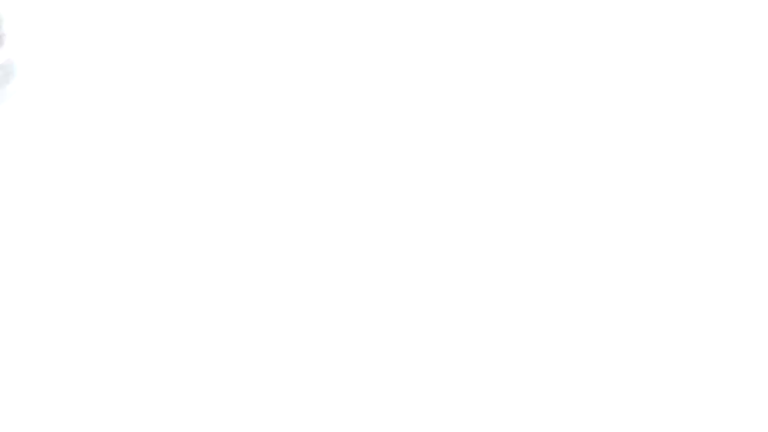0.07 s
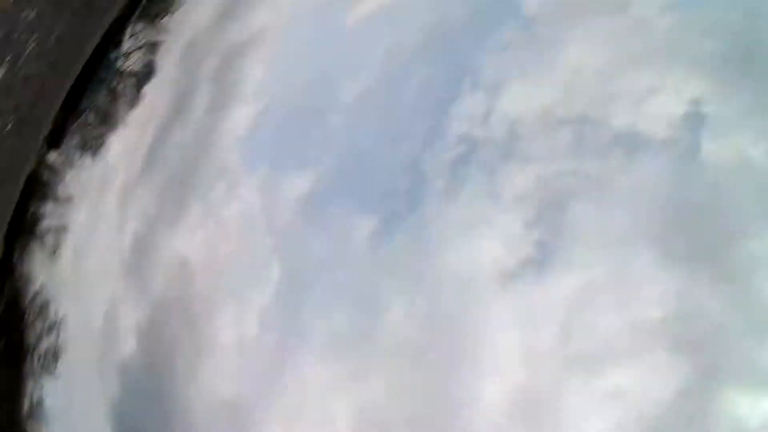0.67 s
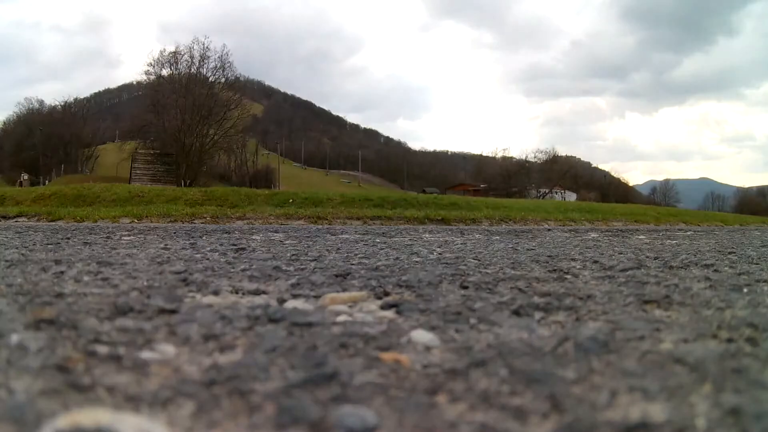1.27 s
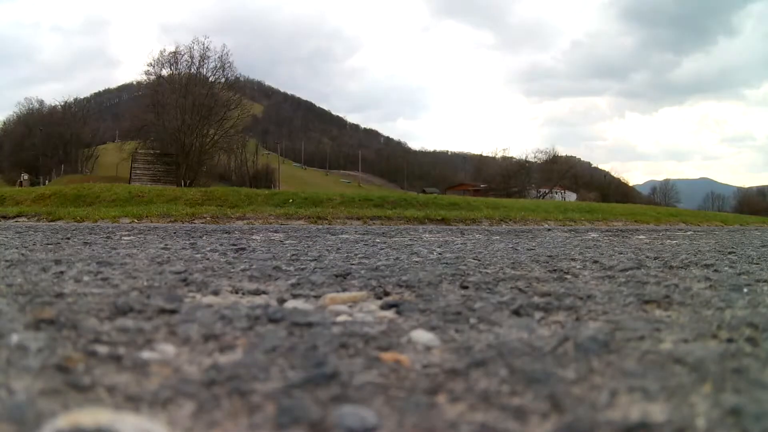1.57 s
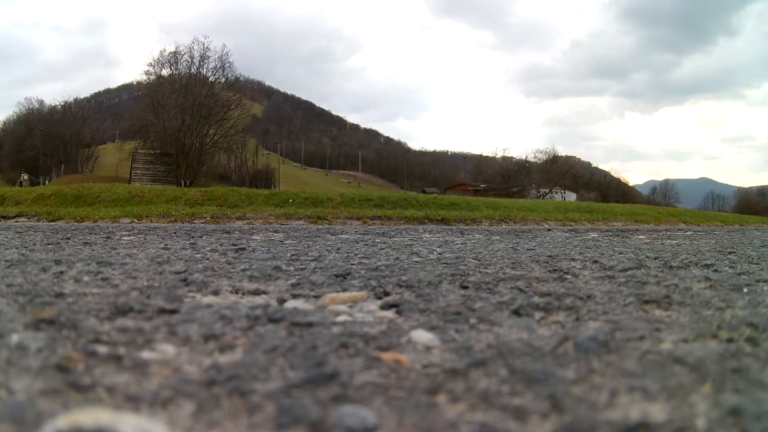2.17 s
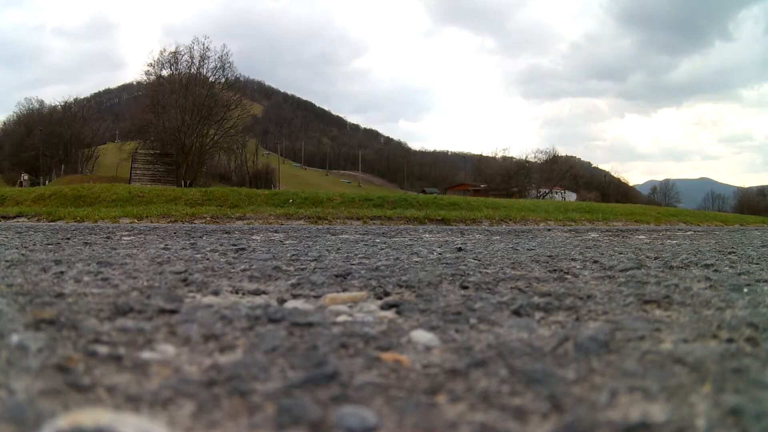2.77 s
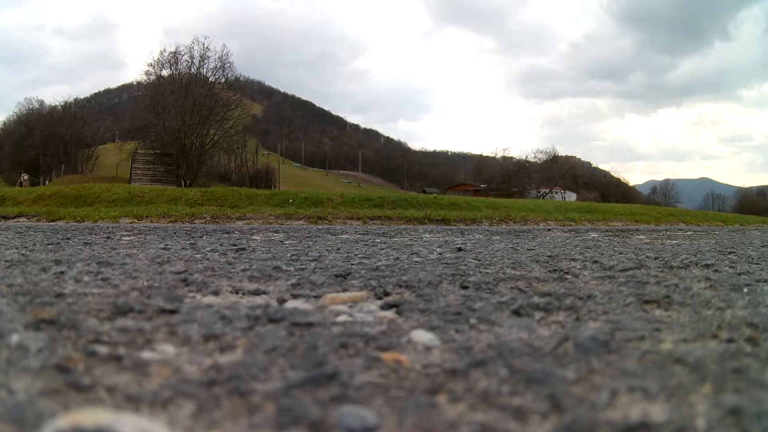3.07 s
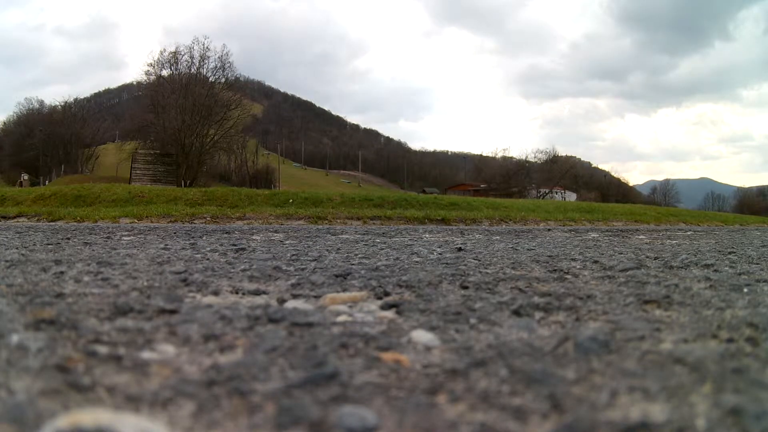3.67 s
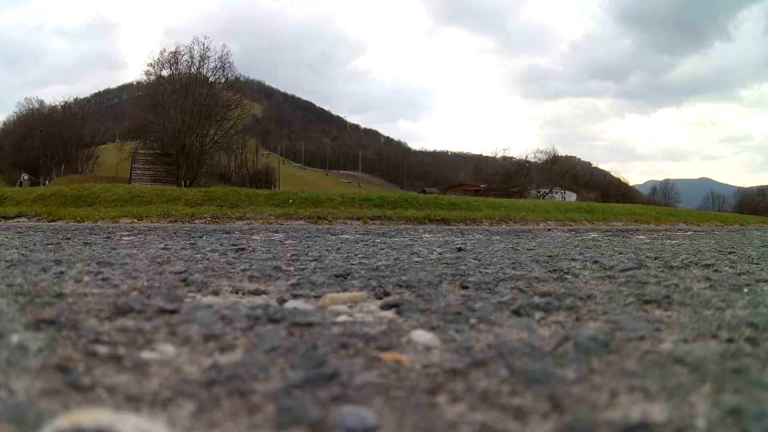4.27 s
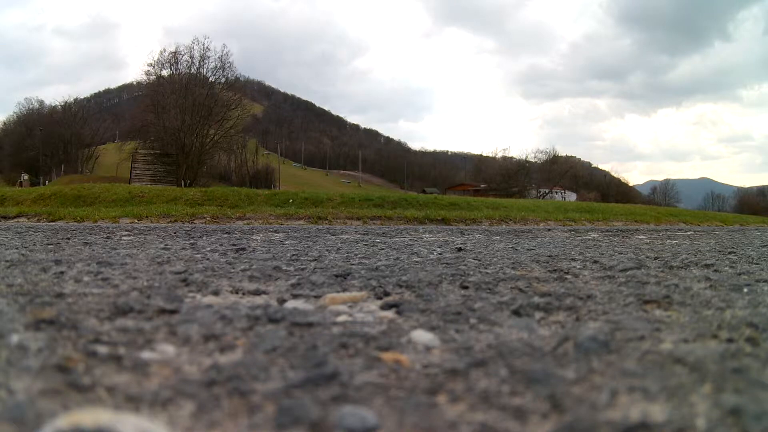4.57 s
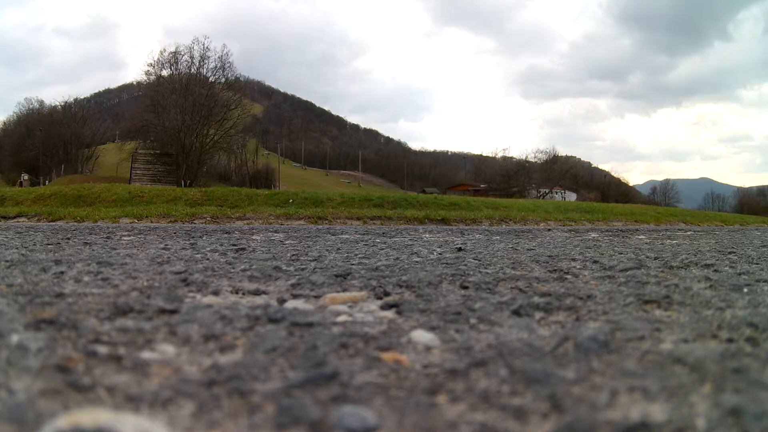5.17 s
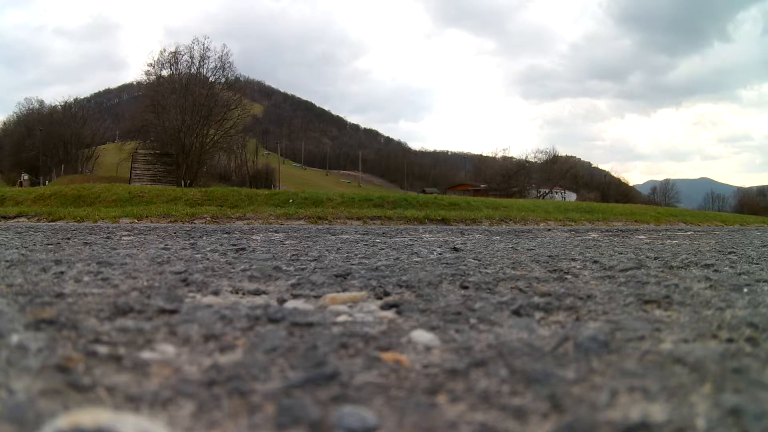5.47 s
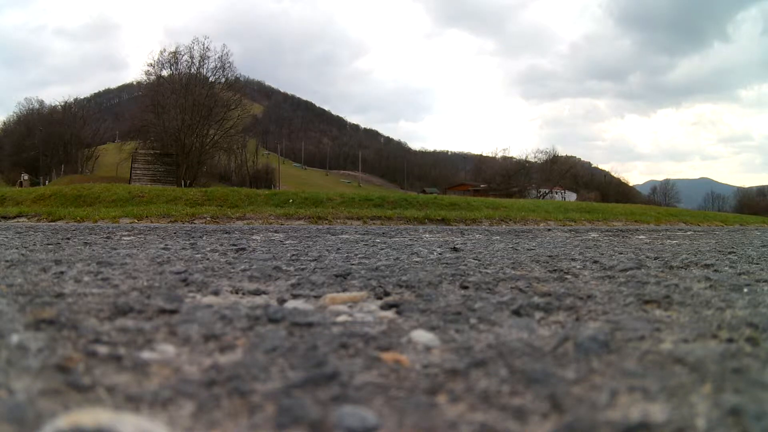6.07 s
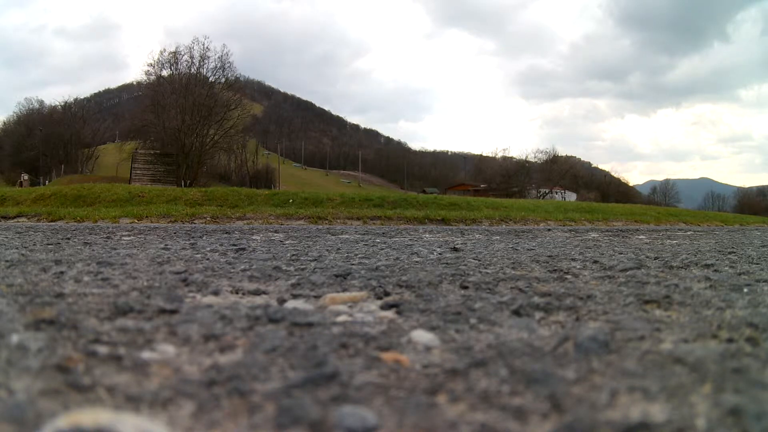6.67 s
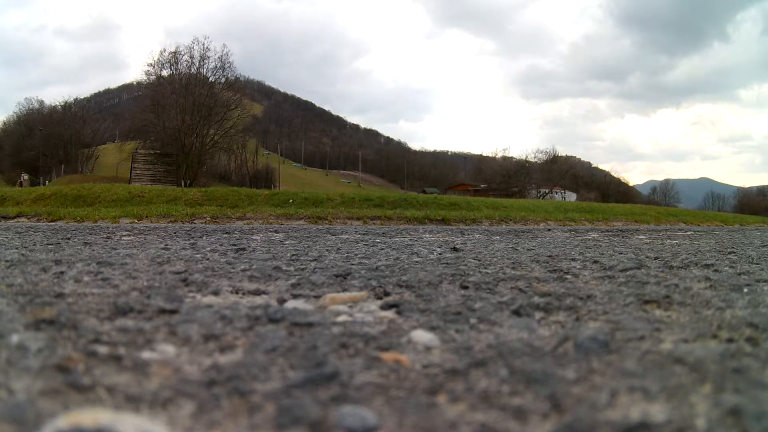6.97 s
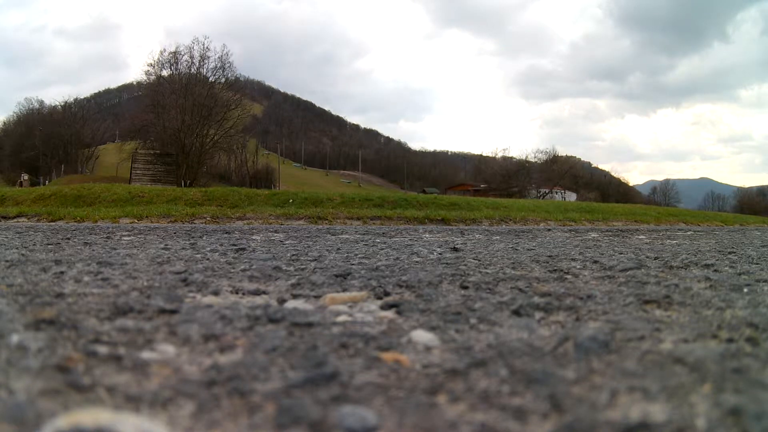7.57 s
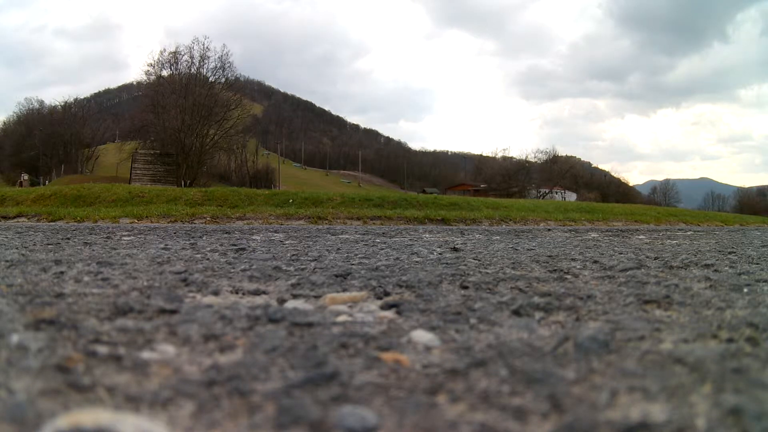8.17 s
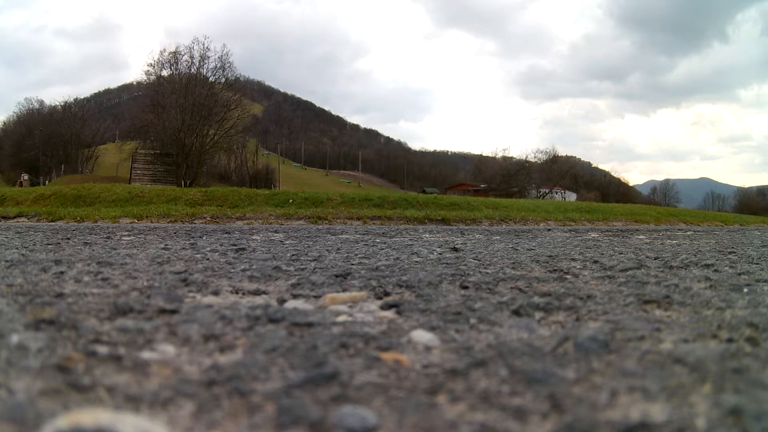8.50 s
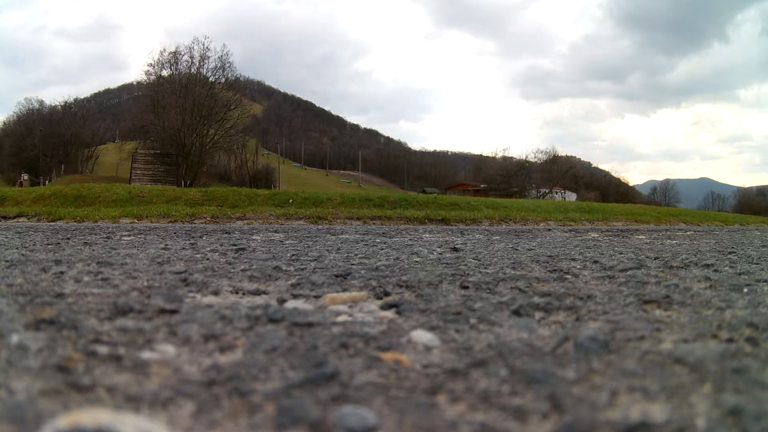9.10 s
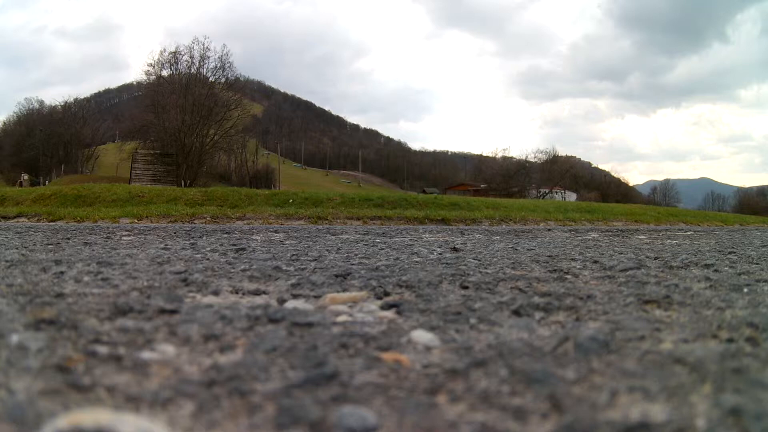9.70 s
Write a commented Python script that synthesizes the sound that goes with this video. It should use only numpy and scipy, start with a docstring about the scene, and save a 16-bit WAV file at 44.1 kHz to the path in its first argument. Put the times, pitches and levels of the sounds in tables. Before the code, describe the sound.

At about 0.2 seconds a small drone slams into gravel, heard very close from a microphone on its frame. A rapid, irregular run of hard plastic cracks follows as it cartwheels, loud enough to distort. Grit scrapes, pebbles click against the frame, the propellers ring briefly after the blows, and a motor clinks near 0.4 and 0.9 seconds. The knocks weaken and stop by 1.3 seconds.

The rest is much quieter: open countryside with a soft hiss and a far rush that swells slightly, then ebbs after 8 seconds. From 2.6 seconds a distant engine putters, growing fainter and stopping around 5.4. Faint, thin bird chirps cluster between 4 and 6 seconds, with single ones near 7.7 and 9.4. Two dull, distant taps come at about 9 and 9.3 seconds, the second softer.

```python
"""Hard plastic cracks and a rattle of stones: a small drone crashes on gravel, cartwheels and skids to rest.
The blows overload the camera riding on its frame and leave the propellers ringing.
Then quiet countryside: a far rush swells and ebbs, an engine putters for three seconds in puffs
of exhaust noise, faint birds whistle, and two dull taps sound in the distance."""
import sys
import numpy as np
from scipy import signal
from scipy.fft import rfft, irfft
from scipy.io import wavfile
from scipy.ndimage import map_coordinates

SR = 44100
rng = np.random.default_rng(int(sys.argv[2]) if len(sys.argv) > 2 else 0)


def file_out(sig):
    """Save sig as 16-bit WAV at sys.argv[1]."""
    # one column per channel
    cols = np.atleast_2d(sig).T
    # limit, then scale
    lim = np.clip(cols, -1, 1)
    pcm = np.round(lim * 32767).astype(np.int16)
    wavfile.write(sys.argv[1], SR, pcm)


N = 438354


def amp(db):
    """Decibels to gain."""
    return 10 ** (np.asarray(db) / 20)


def unit(x):
    """x at rms 1."""
    return x / np.sqrt(np.mean(x ** 2) + 1e-20)


def since(s):
    """Seconds gone by since s at each sample, 0 before it."""
    return np.maximum(np.arange(N) / SR - s, 0)


def before(s):
    """Seconds left until s at each sample, 0 after it."""
    return np.maximum(s - np.arange(N) / SR, 0)


def fade(t, t60):
    """A decay of 60 dB in t60 seconds."""
    return np.exp(-np.log(1000) * t / t60)


def wobble(rate):
    """A smooth random curve, rate knots a second."""
    return map_coordinates(rng.standard_normal(int(N * rate / SR) + 4), [np.arange(N) * rate / SR])


def coloured(x, spectrum, tilt_db=0):
    """x through a (freq_hz, level_db) EQ, its treble tilted by tilt_db an octave about 2 kHz, at rms 1."""
    f = np.fft.rfftfreq(len(x), 1 / SR) + 1
    hz, db = np.transpose(spectrum)
    octaves = np.maximum(np.log2(f / 2000), -1)
    eq_db = np.interp(np.log(f), np.log(hz), db) + tilt_db * octaves
    return unit(irfft(rfft(x) * amp(eq_db), len(x)))


def noise(spectrum, samples=N, tilt_db=0):
    """Steady coloured noise at rms 1."""
    return coloured(rng.standard_normal(samples), spectrum, tilt_db)


def ringing(modes):
    """Half a second of freely dying (pitch_hz, level_db, t60_s) modes."""
    t = np.arange(SR // 2) / SR
    return sum(amp(db) * np.sin(2 * np.pi * hz * t) * fade(t, t60) for hz, db, t60 in modes)


def add(track, s, sound):
    """Mix a sound into the track at s seconds."""
    start = round(s * SR)
    track[start:start + len(sound)] += sound[:N - start]


# Bed of still air and microphone hiss: freq_hz, relative_db
AIR_SPECTRUM = [(25, -6), (100, -8.5), (250, -5), (500, -0.5), (900, 2), (2200, -1), (4000, -4.5),
                (7000, -8.5), (8200, -11.5), (11000, -11), (15500, -9)]
# Midrange wash of the far rush: freq_hz, relative_db
RUSH_SPECTRUM = [(30, -26.5), (250, -22), (550, -19.5), (950, -4), (1450, 1.5), (1700, -5), (2100, -11),
                 (3000, -18.5), (5000, -29), (9000, -38)]

def countryside():
    """A far rush swells, slowly sags and ebbs over still air and hiss."""
    full_s, ebb_s = 2.4, 8.23
    arc_db = -46 - 3.5 * before(full_s) - 0.36 * since(full_s) - 4.6 * since(ebb_s)
    flutter_db = 0.23 * wobble(3) + 0.92 * wobble(30)
    rush = amp(arc_db + flutter_db) * noise(RUSH_SPECTRUM)
    return rush + amp(-50.5) * noise(AIR_SPECTRUM)


# Distant knocks: start_s, level_db, pitch_hz
TAP_HITS = [(9.046, -31, 926), (9.273, -39, 1170)]
# Their muffled tail: freq_hz, relative_db
TAP_TAIL_SPECTRUM = [(400, -30), (850, 0), (1200, -2), (2500, -25)]

def far_taps():
    """Dull, soft-edged knocks from far away, each with a scattered tail."""
    out, t = np.zeros(N), np.arange(SR // 2) / SR
    for s, db, hz in TAP_HITS:
        knock = ringing([(hz, 0, .035)]) * (1 - fade(t, .006))
        tail = amp(-14) * noise(TAP_TAIL_SPECTRUM, len(t)) * fade(t, .22)
        add(out, s, amp(db) * (knock + tail))
    return out


# Single chirps: start_s, lowest_pitch_hz, level_db
BIRD_NOTES = [(4.17, 4500, -51), (4.365, 5720, -61), (4.485, 3580, -57), (4.725, 4290, -59),
              (4.875, 5690, -57), (5.012, 3590, -52), (5.243, 4390, -55), (5.31, 3600, -52),
              (5.52, 4400, -57), (5.705, 5600, -48), (5.833, 3620, -54), (7.69, 4370, -63),
              (9.415, 3470, -58)]

def birds():
    """Thin whistles scoop down and lift a little; the long path through the air makes them flutter."""
    note_s, scoop = .085, .12
    out, progress = np.zeros(N), np.linspace(0, 1, int(note_s * SR))
    for s, hz, db in BIRD_NOTES:
        pitch_hz = hz * (1 + scoop * (progress - .6) ** 2)
        whistle = np.sin(2 * np.pi * np.cumsum(pitch_hz) / SR)
        add(out, s, amp(db) * np.sin(np.pi * progress) * whistle)
    return out * amp(2.5 * wobble(130))


# Engine speed: time_s, firing_rate_hz
ENGINE_SPEED = [(2.6, 26.6), (3.1, 29), (3.5, 28.3), (4, 28.6), (4.6, 31.1), (5.3, 30.5)]
# Exhaust resonances: freq_hz, relative_db
EXHAUST_SPECTRUM = [(30, -28), (190, -27.5), (270, -17), (370, -23), (570, -13.5), (760, -16.5),
                    (900, -5.5), (1050, -10), (1350, -1), (1600, 2), (1800, -13.5), (2130, -6), (2270, -21),
                    (2370, -7.5), (2600, -50), (3100, -22), (3600, -14), (4400, -21), (5500, -37),
                    (9000, -54)]
# Low tones under the putter: firing_rate_multiple, relative_db
THROB_HARMONICS = [(2, -31), (3, -41), (5, -40)]

def engine():
    """Each firing is a rough puff of noise through the exhaust, over a faint low throb."""
    on_s, off_s, attack_s, release_s = 2.588, 5.3, 0.0085, 0.21
    t = np.arange(N) / SR
    firing_hz = np.interp(t, *np.transpose(ENGINE_SPEED)) * (1 + .006 * wobble(12))
    phase = 2 * np.pi * np.cumsum(firing_hz) / SR
    # a puff rises faster than it falls, and every second one is stronger
    puff_db = 2.8 * np.cos(phase) - .9 * np.sin(2 * phase) + .8 * np.cos(phase / 2)
    puffs = amp(puff_db + .8 * wobble(260))
    exhaust = coloured(puffs * rng.standard_normal(N), EXHAUST_SPECTRUM)
    throb = sum(amp(db) * np.sqrt(2) * np.sin(round(k) * phase) for k, db in THROB_HARMONICS)
    throb *= amp(-7 * np.abs(t - 3.8))  # swells up to 3.8 s, then ebbs
    attack = np.minimum(since(on_s) / attack_s, 1)
    release = np.maximum(1 - since(off_s) / release_s, 0) ** 2
    level_db = -35 - 3.5 * since(on_s)  # loudest at the start, then ever fainter
    return attack * release * amp(level_db) * (exhaust + throb)


# Clack of the plastic frame: pitch_hz, relative_db, t60_s (before damping)
FRAME_MODES = [(1140, -10.5, .035), (1318, -9.5, 0.037), (1606, -2.5, 0.023), (1738, 1, 0.045),
               (2011, 1.5, 0.027), (2289.5, 5.5, 0.017), (2499, -3.5, 0.044), (2706, -3, 0.02),
               (2786, -3.5, 0.016), (3091, -7, 0.0302), (3688, -14, 0.04), (4370, -8, 0.027),
               (4726, -2.5, 0.011), (5130, -26, 0.036), (6980, -15.5, 0.024)]
# Crunch of stone: freq_hz, relative_db
CRUNCH_SPECTRUM = [(30, -26.5), (200, -21), (600, -9), (1200, -3), (2200, -1), (3300, -2), (4700, -9),
                   (7000, -15.5), (8200, -25.5), (11000, -18), (16000, -35)]

def frame_contact(grind_s, tilt_db, damping, crunch_db, crunch_t60):
    """Stone meets frame: its modes and a crunch hold while it grinds, then die."""
    t = np.arange(SR // 8) / SR
    free_s = np.maximum(t - grind_s, 0)
    hz, db, t60 = np.transpose(FRAME_MODES)[:, :, None]
    # every point of impact favours other modes
    gains = amp(db + 2.25 * rng.standard_normal(hz.shape) + tilt_db * np.log2(hz / np.median(hz)))
    modes = gains * np.sin(2 * np.pi * (hz * t + rng.random(hz.shape))) * fade(free_s, t60 / damping)
    clack = modes.sum(0) / np.sqrt(np.sum(gains ** 2) / 2)
    crunch = noise(CRUNCH_SPECTRUM, len(t), tilt_db) * fade(free_s, crunch_t60)
    return clack + amp(crunch_db) * crunch


# Small stones clicking: start_s, level_db, band_centre_hz
PEBBLE_HITS = [(.286, -18.5, 3500), (.3677, -17.5, 3530), (.751, -23, 2960), (.9485, -17, 2000),
               (0.975, -13, 2500), (1.004, -15, 2300), (1.0148, -9.5, 1700), (1.0654, -3, 1540),
               (1.0756, -9, 2100), (1.086, -14, 2100), (1.098, -17, 1890), (1.1402, -3, 3020),
               (1.1505, -2, 4200), (1.188, -1.5, 2140), (1.207, -4, 2400), (1.215, -2, 2780),
               (1.247, -9.5, 2300), (1.255, -14, 2380), (1.293, -30, 3000), (1.308, -30, 2960)]

def pebbles():
    """Pebbles flick against the frame; each one's size picks out a broad band of its modes."""
    out = np.zeros(N)
    for s, db, hz in PEBBLE_HITS:
        band = signal.iirpeak(hz, Q=1.2, fs=SR)
        click = frame_contact(grind_s=.001, tilt_db=.5, damping=1.25, crunch_db=-4, crunch_t60=.018)
        add(out, s, amp(db) * signal.lfilter(*band, click))
    return out


# Drags over grit: full_level_at_s, hold_s, level_db
SKID_CUES = [(0.252, 0.0068, -16), (0.347, 0.033, -29.5), (0.447, .014, -12), (0.93, 0.12, -22.5),
             (1.207, 0.053, -26)]

def skids():
    """A stream of small grit rattles through the frame while it scrapes along."""
    grains_per_s, top_hz, rise_s, fall_s = 900, 8500, 0.056, .06
    grains = (rng.random(N) < grains_per_s / SR) * rng.standard_normal(N)
    grains *= amp(3.63 * wobble(160))
    tick = frame_contact(grind_s=0, tilt_db=2.3, damping=1.6, crunch_db=1, crunch_t60=0.0066)
    tick = signal.lfilter(*signal.butter(2, top_hz, fs=SR), tick)  # grit is too light to crack sharply
    drag = sum(amp(db) * fade(before(s), rise_s) * fade(since(s + hold_s), fall_s)
               for s, hold_s, db in SKID_CUES)
    return drag * unit(signal.fftconvolve(grains, tick)[:N])


# A motor's arm and metal bell: pitch_hz, relative_db, t60_s
MOTOR_MODES = [(602.4, 0.5, .04), (1301, -5.5, 0.056), (4490, -9.5, 0.032), (4547, 3, 0.024)]
# Metallic accents: start_s, gain_db
MOTOR_HITS = [(.441, 5.5), (.908, 12)]

def motor_clinks():
    """A motor digs into the stones and clinks."""
    out = np.zeros(N)
    for s, db in MOTOR_HITS:
        add(out, s, amp(db) * ringing(MOTOR_MODES))
    return out


# The frame hits the ground: start_s, level_db, grind_s, tilt_db_per_octave, propeller_ring_db
GROUND_HITS = [(0.2184, 12, 0.004, -1.5, -12.5), (0.2451, 6, 0.0029, 2, -12.5), (.427, -7, .008, 4.5, -29),
               (.434, 7, 0.0084, 5, -8), (0.5494, 6.5, 0.0051, -5.5, -10.5), (.6434, 8, 0.0039, -0.2, -53),
               (0.6895, 10.5, 0.0039, -2, -9), (.8178, 13, .0007, -5.5, -22.5),
               (.826, -2, 0.0085, 1.5, -9.5), (.8956, 11, .0073, -.4, -10.5), (.904, 4.5, 0.0055, 0, -14),
               (0.935, 2, 0.0011, -3.5, -15), (1.0227, 9.5, 0.0019, -2.5, -23.5),
               (1.032, -3, 0.0047, -3.2, -18), (1.1162, 1, 0.0014, -1.8, -14.5),
               (1.1661, 5.5, 0.0013, -2.3, -26), (1.2004, -4, .0014, -4, -23.5),
               (1.2357, -9, 0.0026, -2.7, -23.5), (1.264, -19.5, .005, -2, -23)]
# Blade ring, brighter when stronger: pitch_hz, base_level_db, growth_db_per_ring_db, t60_s
PROPELLER_MODES = [(601.3, -0.5, 1, 0.33), (1277, 16, 2.3, .19), (2490, -22.5, 2, 0.23)]

def tumble():
    """Hard blows on the frame; the propellers ring on until the ground stops them again."""
    out, t = np.zeros(N), np.arange(SR // 2) / SR
    rest_s = 1.323  # the frame lies still
    stops = [hit[0] for hit in GROUND_HITS[1:]] + [rest_s]
    for (s, db, grind_s, tilt_db, ring_db), stop_s in zip(GROUND_HITS, stops):
        crack = frame_contact(grind_s, tilt_db, damping=1.34, crunch_db=-3, crunch_t60=0.023)
        add(out, s, amp(db) * crack)
        ring = ringing([(hz, base + growth * ring_db, t60) for hz, base, growth, t60 in PROPELLER_MODES])
        choke = fade(np.maximum(t - (stop_s - s), 0), 0.085)
        add(out, s, ring * choke)
    return out


def scene():
    """The close crash and the quiet country around it, in mono."""
    crash = tumble() + motor_clinks() + pebbles() + skids()
    return (crash + engine() + birds() + far_taps() + countryside())[None]


def overload(x, hardness):
    """The input stage flattens whatever passes full scale."""
    return x / (1 + np.abs(x) ** hardness) ** (1 / hardness)


def gain_control(x, depth_db, lag_s):
    """Loud bursts pull the gain down a moment later; it then swells back."""
    t = np.arange(SR // 4) / SR
    memory = t ** 8 * np.exp(-8 * t / lag_s)  # peaks at lag_s
    recent_power = np.abs(signal.fftconvolve(x ** 2, memory[None] / memory.sum(), axes=1)[:, :N])
    return x * amp(-depth_db * np.tanh(recent_power / .3))


def record(dry):
    """The camera clips, ducks its gain and trims the deepest bass and the highest treble."""
    low_cut_hz, top_hz = 15, 15750
    x = gain_control(overload(dry, hardness=16), depth_db=7.0, lag_s=0.022)
    x = signal.lfilter(*signal.butter(1, low_cut_hz, "high", fs=SR), x)
    return signal.sosfilt(signal.ellip(10, .3, 80, top_hz, fs=SR, output="sos"), x)


dry = scene()
out = record(dry)
file_out(out)
```